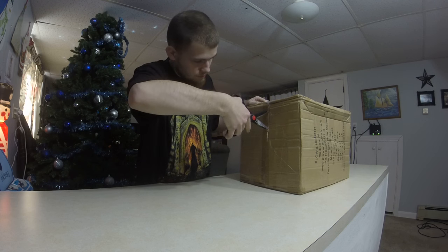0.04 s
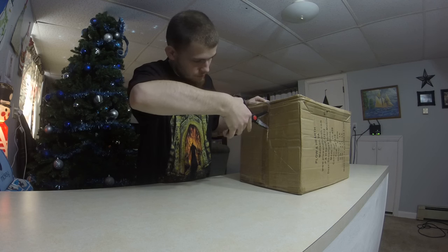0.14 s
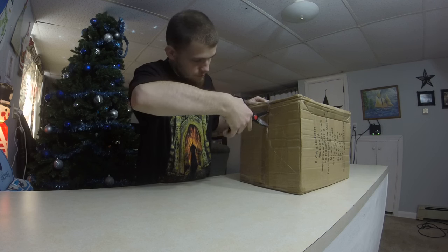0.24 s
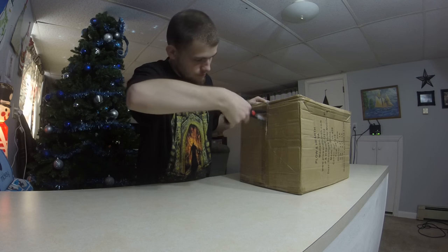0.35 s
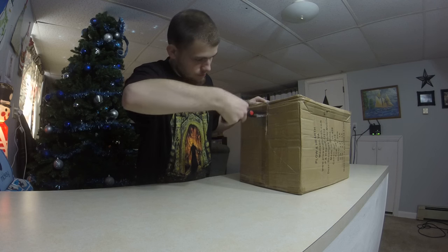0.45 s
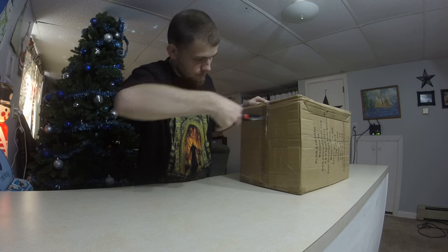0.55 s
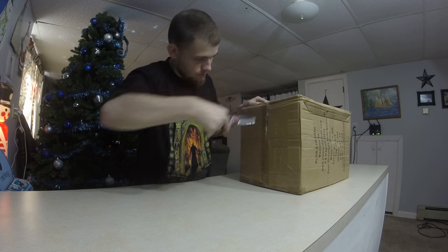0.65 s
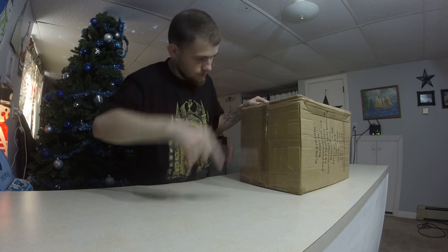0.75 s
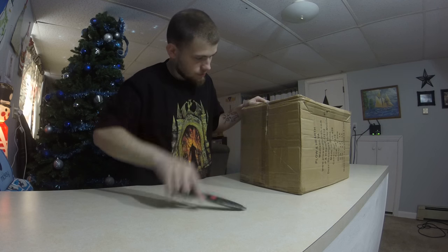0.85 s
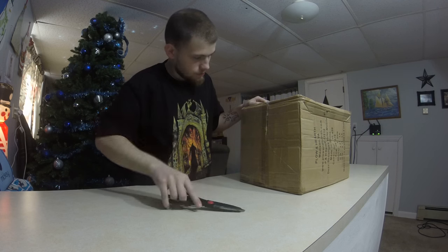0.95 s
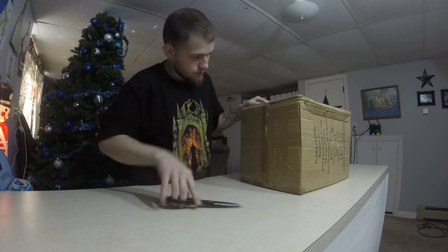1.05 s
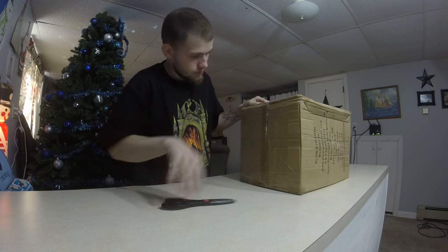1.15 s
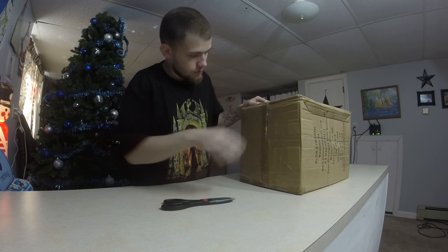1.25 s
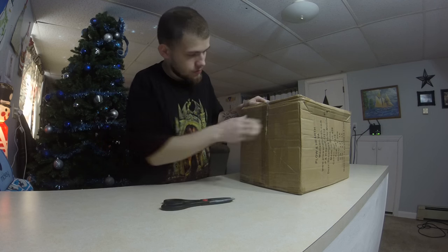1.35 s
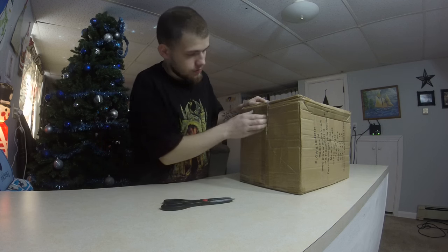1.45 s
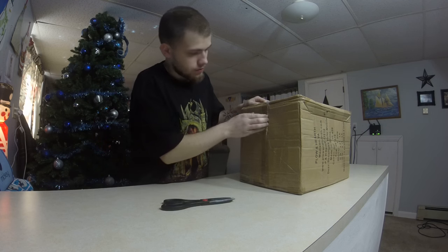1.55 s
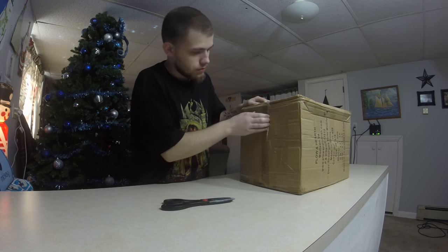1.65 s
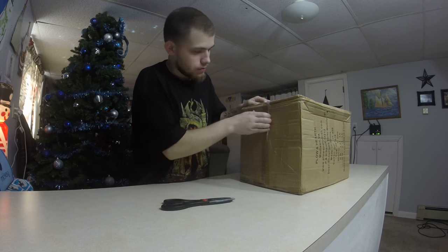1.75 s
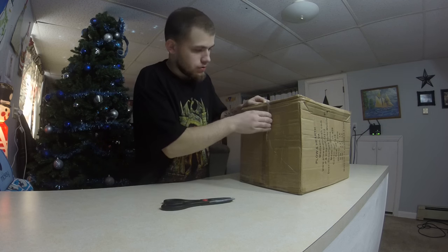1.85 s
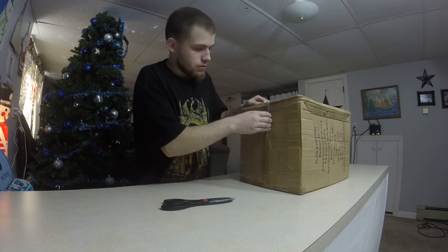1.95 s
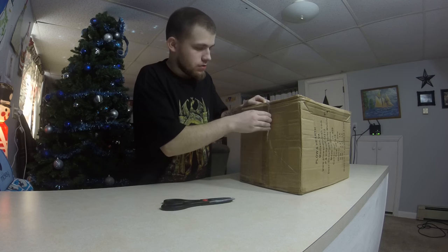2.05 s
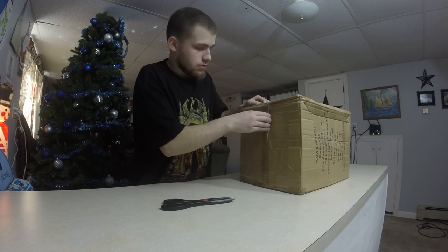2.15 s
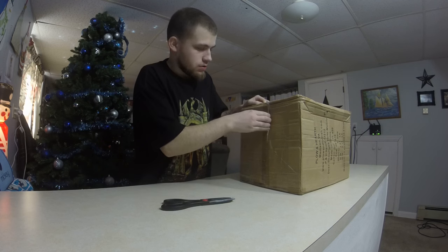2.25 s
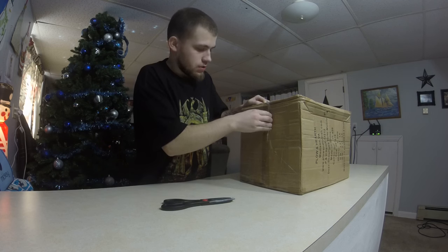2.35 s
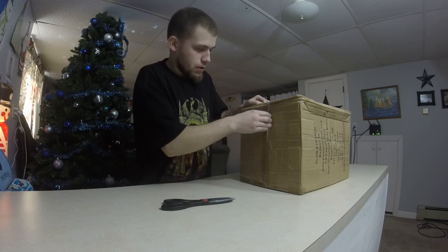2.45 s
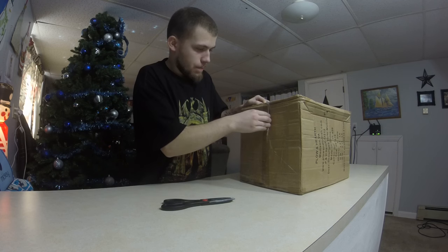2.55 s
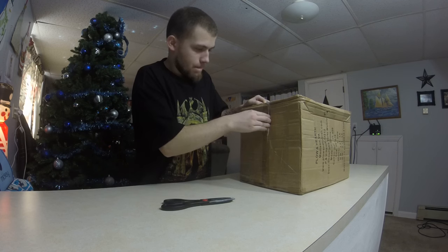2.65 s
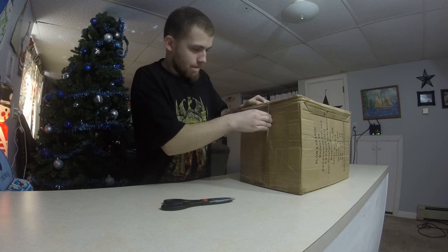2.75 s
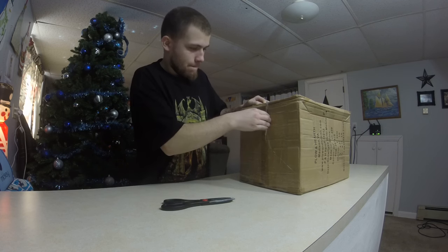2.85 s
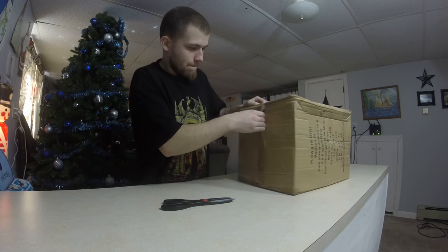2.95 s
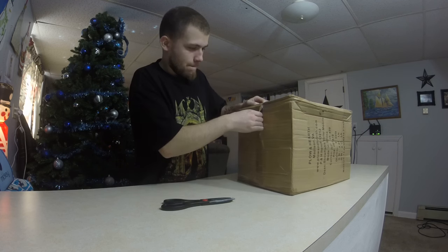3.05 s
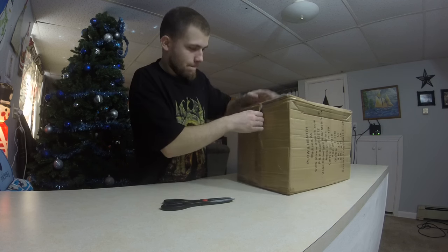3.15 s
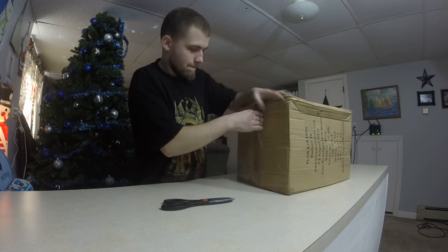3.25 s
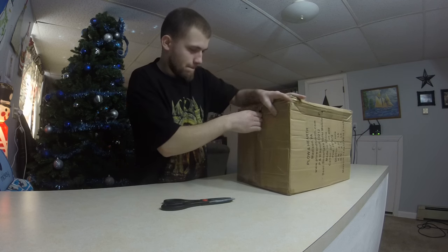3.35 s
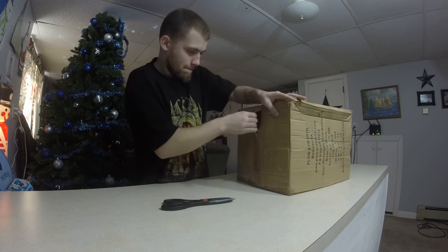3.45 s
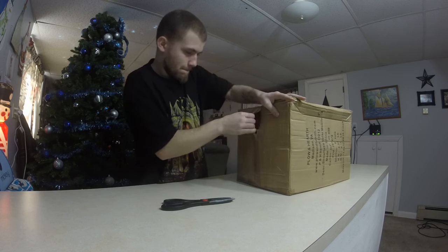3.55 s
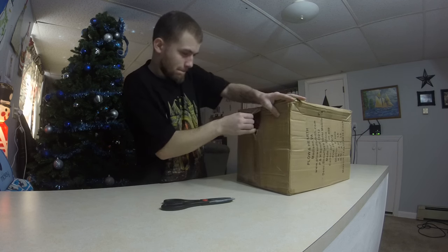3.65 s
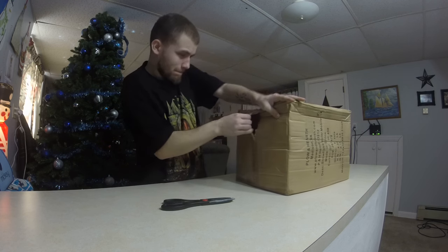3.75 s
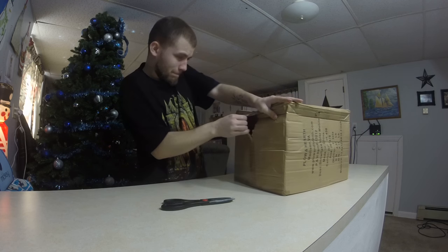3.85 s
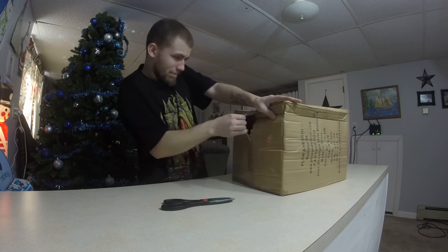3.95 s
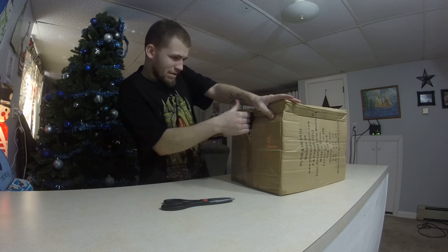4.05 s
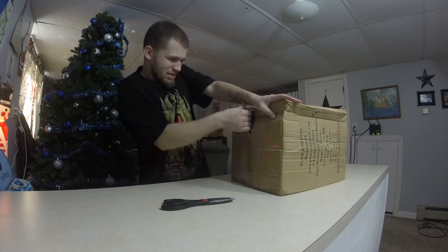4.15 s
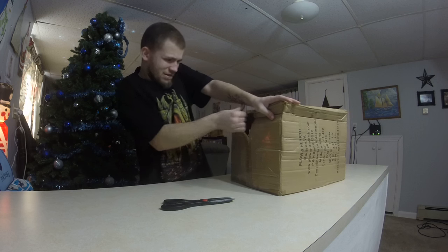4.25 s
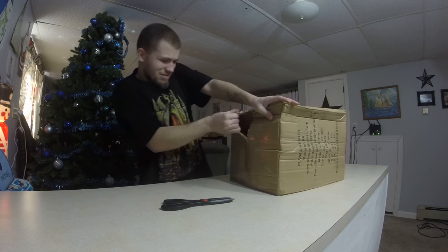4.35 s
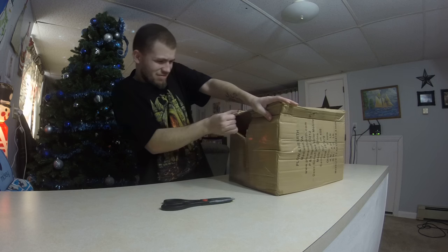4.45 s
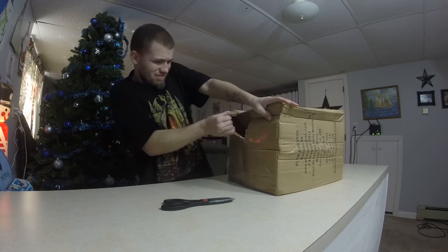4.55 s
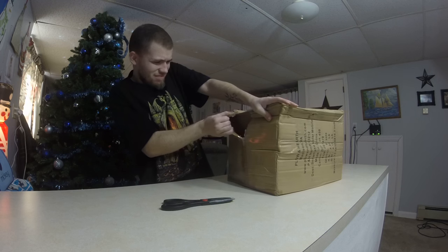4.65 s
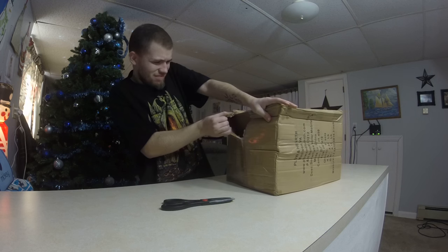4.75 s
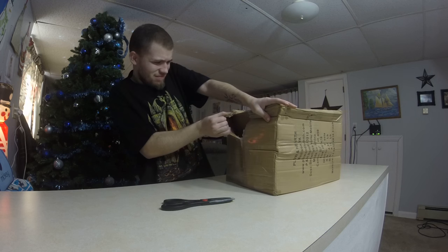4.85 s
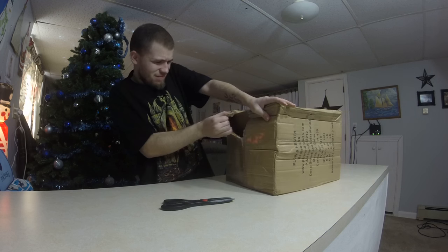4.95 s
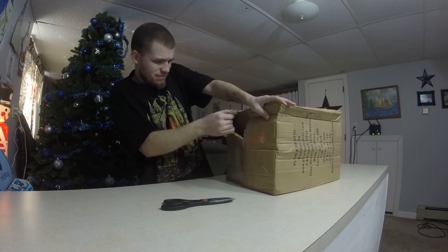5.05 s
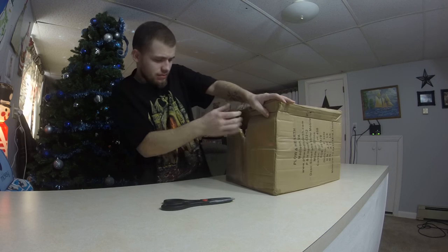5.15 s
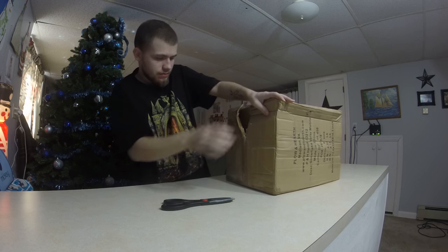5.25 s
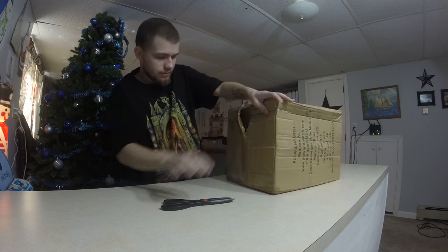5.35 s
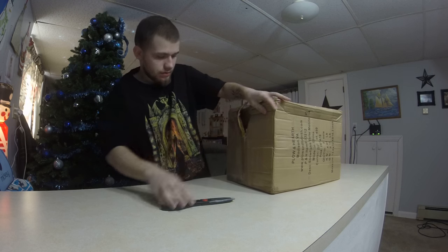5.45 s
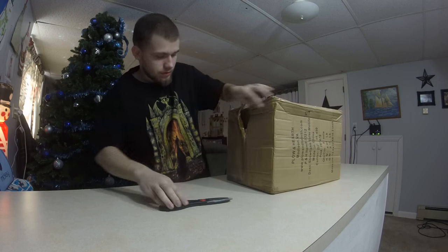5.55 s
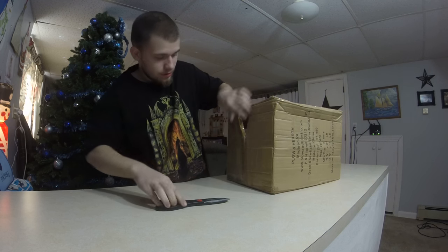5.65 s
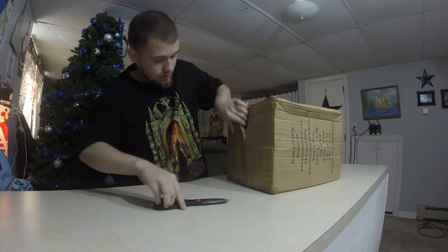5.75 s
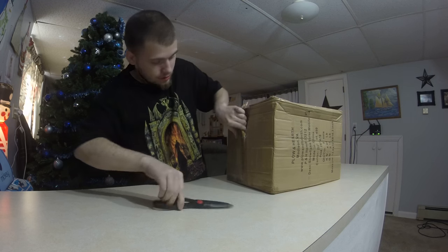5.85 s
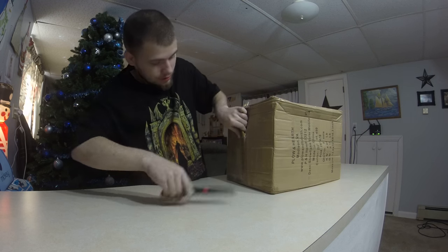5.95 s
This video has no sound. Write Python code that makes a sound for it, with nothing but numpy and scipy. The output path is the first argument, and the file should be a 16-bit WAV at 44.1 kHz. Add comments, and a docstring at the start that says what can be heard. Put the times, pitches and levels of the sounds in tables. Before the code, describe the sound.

In a small quiet room, scissor blades bite through tape on a hollow cardboard box with snaps and a thump, then clatter and slide onto a hard counter. Fingers pick quietly at the tape, then pull it in crackling rips, one suddenly very loud with a boxy thump. Smaller crackles follow, and the scissors are softly picked up. Close, dry pickup with low mains hum.

```python
"""Scissors snip the packing tape on a cardboard box: the blades ring, the tape snaps and the hollow box thumps.
They are dropped on the counter, where they slide and clatter: noise knocks and ringing metal.
Fingers rub, pick and pull off the tape in crackling rips, one of them loud: runs of tiny slips of glue.
At the end the scissors are picked up again, with soft knocks and scrapes.
Throughout, a small room adds short echoes, soft air noise and a low mains hum."""
import sys
import numpy as np
from scipy import signal
from scipy.fft import rfft, irfft
from scipy.io import wavfile

SR = 44100
rng = np.random.default_rng(int(sys.argv[2]) if len(sys.argv) > 2 else 0)


def unload_audio(sound):
    """Save the sound as a 16-bit wav file, at the path given as the first command line argument."""
    columns = np.transpose(np.atleast_2d(sound))
    # keep every value between -1 and 1, then stretch to whole-number steps
    steps = np.round(np.clip(columns, -1, 1) * 32767)
    wavfile.write(sys.argv[1], SR, steps.astype(np.int16))


N = 264996
T = np.arange(N) / SR  # time in the scene [s]
AGE = T[:SR // 3]  # time since a short sound began [s]

# In all tables of ringing tones, t60 is the time a tone takes to fade by 60 dB.
# ringing tones of the hollow box: (frequency [Hz], level [dB], t60 [s])
BOX_TONES = [(75, -25, .07), (127.5, 7, 0.058), (197, 2, 0.13), (211.6, 4, 0.16), (263.6, 14, 0.068),
             (274.2, -11.5, 0.24), (392.4, -9.5, 0.13)]
# ringing tones of the card panels: (frequency [Hz], level [dB], t60 [s])
PANEL_TONES = [(411, 10, 0.054), (586, -8.5, 0.18), (660, -9, 0.056), (818, -2, 0.096), (840, -18, 0.015),
               (1010, 1, 0.031), (1229, -2, 0.064)]
# ringing tones of the scissors pressed flat on the counter: (frequency [Hz], level [dB], t60 [s])
PRESSED_TONES = [(530, 2.5, 0.047), (600, -4.5, 0.051), (1014, -1, 0.064), (1715, 3, 0.033),
                 (1923, 1.5, .028), (2630, -4.5, 0.038), (2813, 0, 0.029), (3620, -5.5, 0.023),
                 (4740, -13.5, 0.026), (5620, -10, 0.013), (6360, -12, 0.032), (7800, -14, 0.048),
                 (9040, -20, 0.025), (10800, -24, 0.039)]
# tone colour of the tape: (frequency [Hz], level [dB])
TAPE_COLOUR = [(180, 6), (300, 1), (678, 0.5), (828, 0.5), (1150, -14), (1230, -16), (1690, -21.5),
               (5430, -24), (6620, -29), (14500, -43), (16000, -53)]
# tone colour of the scissors touching the counter: (frequency [Hz], level [dB])
CLATTER_COLOUR = [(180, 15), (300, -27), (667, 0.5), (1460, -9), (2030, -7.5), (3080, -10), (3950, -12.5),
                  (10700, -26.5), (15000, -39), (16000, -41)]

BLOW_S = .03  # reference length for the level of a short sound
LOW_HZ, CARD_HZ, HANDLE_HZ, TICK_HZ = 400, 1400, 3000, 7000  # borders between the parts of a sound
SNAP_T60_S = 0.049  # fade time of the noise in a tape snap or pick
TOUCH_START_S, TOUCH_END_S = 1.4, 6.0  # while fingertips rest on the tape


def undb(db):
    """Turn decibels into a gain."""
    return 10 ** (np.asarray(db) / 20)


def unit(x):
    """Scale to an average strength (rms) of 1."""
    return x / np.sqrt(np.mean(x ** 2) + 1e-20)


def blow(x):
    """Scale a short sound to the energy of rms 1 held for BLOW_S."""
    return x / np.sqrt(np.sum(x ** 2) / (BLOW_S * SR) + 1e-20)


def add(out, s, x):
    """Mix x into out, starting at time s."""
    i = max(int(s * SR), 0)
    out[i:i + len(x)] += x[:max(N - i, 0)]


def band(x, hz, kind):
    """Keep only some frequencies, with a Butterworth filter."""
    return signal.sosfilt(signal.butter(3, hz, kind, fs=SR, output="sos"), x)


def through(x, response):
    """Let every sample of x set off the response (convolution)."""
    return signal.fftconvolve(x, response)[:len(x)]


def colour(x, points, size=4096):
    """Shape the tone to an outline of (Hz, dB) points, without any sound before its cause."""
    hz, db = np.transpose(points)
    outline = np.interp(np.log(np.fft.rfftfreq(size, 1 / SR) + 1), np.log(hz), db)
    # folding the cepstrum gives a minimum-phase filter
    cepstrum = irfft(np.log(undb(outline)))
    cepstrum[1:size // 2] *= 2
    cepstrum[size // 2 + 1:] = 0
    return through(x, irfft(np.exp(rfft(cepstrum))))


def split(x, top_hz):
    """Middle, upper and treble parts of a sound."""
    middle = band(x, [LOW_HZ, CARD_HZ], "bandpass")
    upper = band(x, [CARD_HZ, top_hz], "bandpass")
    return middle, upper, band(x, top_hz, "highpass")


def ring(modes, scatter_db, detune):
    """Fading tones of a struck object; each point of contact changes their levels and pitches a little."""
    hz, db, t60 = np.transpose(modes)[:, :, None]
    weight, shift = rng.uniform(-1, 1, (2, len(modes), 1))
    waves = np.sin(2 * np.pi * hz * (1 + detune * shift) * AGE)
    fade = np.exp(-np.log(1000) * AGE / t60)
    return np.sum(undb(db + scatter_db * weight) * waves * fade, axis=0)


def crack(t60, click_db):
    """A sharp click and its quickly fading noise."""
    fade = np.exp(-np.log(1000) * AGE / t60)
    out = blow(rng.standard_normal(len(AGE)) * fade)
    out[0] += undb(click_db) * np.sqrt(BLOW_S * SR)
    return out


def grains(rate, spread_db, smear_db):
    """Tiny slips of unequal size, rate per second on average, each with a short hiss after it."""
    sizes = undb(spread_db * np.minimum(rng.exponential(size=N), 4)) * rng.choice([-1, 1], N)
    slips = sizes * (rng.random(N) < rate / SR)
    keep = np.exp(-1 / (.004 * SR))  # the power of the hiss fades over 4 ms
    power = signal.lfilter([1 - keep], [1, -keep], slips ** 2)
    return slips + undb(smear_db) * np.sqrt(power) * rng.standard_normal(N)


def stroke(start, length, attack, release):
    """Pressure of one stroke: it rises, holds and dies away."""
    rise = np.clip((T - start) / attack, 0, 1)
    return rise * np.exp(-np.maximum(T - start - length, 0) / release)


def rips():
    """Glue lets go in a swelling run of slips that drive the card beneath and rock the box."""
    # tape tearing loose: (middle [s], half length [s], box thump [dB], tape [dB], brightness [dB])
    # brightness turns the treble up and the card down
    rip_table = [(0.274, 0.013, -32.5, -42.5, -5.5), (0.414, 0.021, -36.5, -55.5, -16.5),
                 (0.501, 0.0079, -31.5, -36.5, -3.5), (2.992, 0.035, -43, -44, 0.5),
                 (3.047, 0.023, -33.5, -46, -2.5), (3.156, 0.041, -44, -46, -1.5),
                 (3.339, 0.032, -41, -45, 3.5), (3.468, 0.028, -32, -34, 0.5), (3.798, 0.037, -34, -37, -5),
                 (3.843, 0.019, -60, -38.5, -1.5), (4.079, 0.064, -44, -50, 0), (4.239, 0.016, -61, -46, 4),
                 (4.31, 0.012, -17.5, -16, -1), (4.538, 0.0097, -36, -44, 10),
                 (4.571, 0.012, -42, -40.5, 14.5), (4.597, 0.018, -40.5, -46.5, -8),
                 (5.17, 0.0076, -49, -39, -0.5)]
    card_db, sizzle_db, rock_db = -3.5, -7.5, -21  # card and sizzle relative to tape, rocking to thump
    slips = colour(grains(rate=2500, spread_db=5.0, smear_db=-3.0), TAPE_COLOUR)
    card, tape, sizzle = split(slips, TICK_HZ)
    panels = ring(PANEL_TONES, scatter_db=1, detune=.005)
    card = unit(card) + undb(-6) * unit(through(card, panels))
    parts = box_rocking(), box_rumble(), card, tape, sizzle
    out = np.zeros(N)
    for s, half, thump_db, tape_db, bright_db in rip_table:
        levels = (thump_db + rock_db, thump_db, tape_db + card_db - bright_db,
                  tape_db, tape_db + sizzle_db + bright_db)
        near = np.abs(T - s) < 2 * half
        swell = np.exp(-((T[near] - s) / half) ** 2)
        out[near] += swell * sum(undb(db) * unit(part[near]) for db, part in zip(levels, parts))
    return out


def snaps():
    """The sudden snaps of tape and card as the tape is cut and pulled."""
    # tape snapping and card buckling: (time [s], box thump [dB], crack [dB], brightness [dB])
    # brightness turns the treble up and the card down
    snap_table = [(0.1724, -17, -31.5, -0.5), (0.1841, -30, -39, 3), (0.234, -27.5, -43.5, 3),
                  (0.319, -60, -54.5, 4), (0.394, -39, -47.5, 4), (1.458, -41.5, -75, -14),
                  (1.538, -37.5, -54, -6.5), (1.5606, -33, -39.5, 1), (1.993, -67, -56, 6),
                  (2.12, -71, -66.5, 16.5), (2.24, -76, -65, 0), (2.672, -51.5, -52, 1.5),
                  (2.761, -52, -53.5, -2), (2.893, -50, -42.5, 3), (2.946, -49, -45, 4),
                  (3.101, -41, -52.5, 0), (3.224, -68, -58.5, 15.5), (3.318, -39, -42, -4.5),
                  (3.347, -31, -48.5, -2), (3.434, -45, -47, 0), (3.4643, -39, -31.5, 1),
                  (3.817, -40, -35, 11), (3.851, -62, -48.5, 15.5), (4.157, -48, -43.5, -2.5),
                  (4.205, -65, -48.5, 6.5), (4.298, -21.5, -28, 11), (4.304, -18, -21, -1.5),
                  (4.355, -48, -40.5, 13.5), (4.482, -66, -55.5, 8), (4.557, -56, -40.5, 1),
                  (4.595, -50, -47.5, 24), (4.668, -36.5, -50.5, -8.5), (4.766, -38, -64, -22.5),
                  (4.928, -43.5, -58.5, -17.5), (5.1634, -71, -42.5, 4), (5.178, -42, -45.5, 0),
                  (5.3414, -64, -48.5, 5), (5.457, -66, -51, 7), (5.589, -43, -50, -8),
                  (5.684, -47, -55.5, -9)]
    out = np.zeros(N)
    for s, *levels in snap_table:
        add(out, s, snap(*levels))
    return out


def snap(thump_db, crack_db, bright_db):
    """Tape gives way at once: a tick, a crack in the panels and a thump of the whole box."""
    card_db, tick_db = -.5, -13  # relative to the crack
    card, tape, tick = split(colour(crack(SNAP_T60_S, click_db=-4.5), TAPE_COLOUR), TICK_HZ)
    panels = ring(PANEL_TONES, scatter_db=3, detune=.015)
    card = blow(card) + undb(-7.0) * blow(band(panels, LOW_HZ, "highpass"))
    tape = blow(tape) + undb(-11) * blow(flap(0.89 * SNAP_T60_S))
    thump = band(ring(BOX_TONES, scatter_db=2, detune=.015), 90, "highpass")
    levels = thump_db, crack_db + card_db - bright_db, crack_db, crack_db + tick_db + bright_db
    return sum(undb(db) * blow(part) for db, part in zip(levels, (thump, card, tape, tick)))


def flap(t60, count=7):
    """Each loose piece of tape has its own few short resonances."""
    hz = 1700 * 2 ** (2 * rng.random(count))
    return ring([(f, 0, t60) for f in hz], scatter_db=-6.5, detune=0)


def snips():
    """The blades ring briefly each time they bite through the tape."""
    # blades closing through the tape: (time [s], level [dB])
    snip_table = [(0.172, -47), (0.1833, -36), (0.233, -46), (.319, -51)]
    # ringing tones of the closing blades: (frequency [Hz], level [dB], t60 [s])
    blade_tones = [(1115, -4.5, 0.038), (2790, -1, 0.024), (2980, 2, 0.019), (3550, -3, 0.023),
                   (5230, -22, .04)]
    out = np.zeros(N)
    for s, db in snip_table:
        add(out, s, undb(db) * blow(ring(blade_tones, scatter_db=2, detune=0.013)))
    return out


def knocks():
    """Handles and blades bounce on the counter; each contact shifts their ring, less so under the hand."""
    # knocks: (time [s], thud [dB], clack [dB], brightness [dB], share of the pressed ring)
    # brightness turns the blades up and the counter down
    # share: 1 is pressed by the hand, 0 is loose, below 0 takes pressed ring away from extra loose ring
    knock_table = [(0.905, -36, -26.5, -1.5, 0.97), (0.944, -42.5, -37.5, 0.5, 0.63),
                   (1.1391, -33.5, -27, 3.5, 0.04), (1.157, -41, -23, 3, 0), (1.167, -36, -40, -10.5, 0),
                   (1.179, -37, -42, -13, 0), (1.2, -34, -45.5, -16, 0.1), (1.212, -39, -47, -16, 0.2),
                   (1.2269, -37, -32.5, 3.5, 0), (1.236, -45, -35.5, 1, -2), (1.247, -38.5, -36, -4, 0),
                   (1.29, -45, -44, -5.5, 0), (5.8671, -40.5, -39.5, -2.5, 0.8),
                   (5.889, -47.5, -49.5, -3.5, 0.1), (5.971, -48.5, -41.5, -2, 0.4),
                   (5.995, -49, -50, 2.5, 0.3)]
    # ringing tones of the loose scissors: (frequency [Hz], level [dB], t60 before damping [s])
    loose_tones = [(585, 1.5, 0.1), (540, 2, 0.13), (619, 5.5, 0.14), (1009, 1, 0.12), (1875, 0, 0.07),
                   (2000, -4.5, 0.019), (2024, 17.5, 0.034), (2527, 5.5, 0.023), (3070, -26, 0.034),
                   (3680, -2, 0.052), (3960, 8.5, 0.024), (4430, -0.5, 0.081), (5630, -9, 0.084),
                   (6300, -5.5, 0.065), (7880, -19, 0.077), (8440, -7, 0.043), (10640, -29, 0.027)]
    counter_db, blade_db = -5, -5.5  # relative to the clack
    damp_s = 0.021  # the counter damps the bouncing scissors
    out = np.zeros(N)
    for s, thud_db, clack_db, bright_db, pressed in knock_table:
        contact = blow(colour(crack(0.092, click_db=-45), CLATTER_COLOUR))
        loose = blow(ring(loose_tones, scatter_db=3, detune=.06) * np.exp(-AGE / damp_s))
        loose = blow(loose + undb(1) * contact)
        held = blow(ring(PRESSED_TONES, scatter_db=1, detune=.005)) + undb(-12) * contact
        clack = pressed * held + (1 - pressed) * loose
        thud = band(crack(0.18, click_db=-5.0), [90, 380], "bandpass")
        parts = thud, *split(clack, HANDLE_HZ)
        levels = thud_db, clack_db + counter_db - bright_db, clack_db, clack_db + blade_db + bright_db
        add(out, s, sum(undb(db) * blow(part) for db, part in zip(levels, parts)))
    return out


def slide():
    """The grain of the counter rubs the sliding scissors and sets them ringing."""
    # scissors sliding on the counter: (start [s], length [s], level [dB])
    slide_table = [(1.04, 0.081, -41), (1.178, 0.12, -56), (5.512, 0.035, -52), (5.834, 0.073, -52)]
    attack_s, release_s = 0.0075, 0.015
    rub = grains(rate=4000, spread_db=2, smear_db=-6)
    ringing = band(through(rub, ring(PRESSED_TONES, scatter_db=0, detune=0)), LOW_HZ, "highpass")
    hiss = band(colour(rub, CLATTER_COLOUR), HANDLE_HZ, "highpass")
    scrape = unit(ringing) + undb(-7.5) * unit(hiss)
    pressure = sum(undb(db) * stroke(start, length, attack_s, release_s)
                   for start, length, db in slide_table)
    return unit(scrape) * pressure


def handling():
    """Fingers rub and crinkle the tape in strokes, and barely stir it while they rest."""
    # fingers and blades rubbing the tape: (start [s], length [s], rustle [dB], box rumble [dB])
    rub_table = [(0.318, 0.16, -57.5, -46), (1.747, 0.17, -60.5, -59), (2.362, 0.034, -65, -61),
                 (2.743, 0.28, -56, -57), (3.05, 0.087, -58.5, -49.5), (3.362, 0.43, -54.5, -53),
                 (3.85, 0.044, -50.5, -59), (4.052, 0.35, -52.5, -59), (4.363, 0.33, -56.5, -54),
                 (4.71, 0.18, -58.5, -54), (4.989, 0.21, -55, -55.5), (5.072, 0.15, -50, -58),
                 (5.303, 0.16, -55.5, -58.5), (5.533, 0.25, -63.5, -48.5)]
    # tone colour of the rustle: (frequency [Hz], level [dB])
    rustle_colour = [(240, -20), (400, 2), (425, -45), (489, -2.5), (708, -6.5), (814, -4.5), (1200, -8),
                     (3120, -1), (7060, -12.5), (14800, -27.5), (16000, -60)]
    attack_s, release_s = 0.03, 0.092
    touch = stroke(TOUCH_START_S, TOUCH_END_S - TOUCH_START_S, attack_s, release_s)
    on_tape, on_box = undb(-70.5) * touch, undb(-67.5) * touch
    for start, length, rustle_db, rumble_db in rub_table:
        pressure = stroke(start, length, attack_s, release_s)
        on_tape = np.maximum(on_tape, undb(rustle_db) * pressure)
        on_box = np.maximum(on_box, undb(rumble_db) * pressure)
    crinkle = grains(rate=1300, spread_db=4.6, smear_db=0)
    card, tape, sizzle = split(colour(crinkle, rustle_colour), TICK_HZ)
    rustle = unit(tape) + undb(-3) * unit(card) + undb(-8.5) * unit(sizzle)
    # lone creases pop on top of the dense crinkle
    pops = grains(rate=60, spread_db=2.0, smear_db=-2.5)
    rustle = rustle + undb(-6.5) * unit(band(colour(pops, rustle_colour), CARD_HZ, "highpass"))
    return on_tape * rustle + on_box * box_rumble()


def picks():
    """Fingernails flick the tape at random moments, too lightly to move the box."""
    picks_per_s, level_db, spread_db = 4, -63, 5
    touch_s = TOUCH_END_S - TOUCH_START_S
    out = np.zeros(N)
    for when, size in rng.random((int(picks_per_s * touch_s), 2)):
        tick = blow(band(colour(crack(SNAP_T60_S, click_db=-4), TAPE_COLOUR), 1850, "highpass"))
        add(out, TOUCH_START_S + when * touch_s, undb(level_db + spread_db * (2 * size - 1)) * tick)
    return out


def chafes():
    """Tape, fingertips and scissors drag along a surface and hiss in one band each."""
    # chafes: (middle [s], half length [s], pitch [Hz], band half-width [share of pitch], level [dB])
    chafe_table = [(1.877, 0.061, 3160, .3, -65), (2.811, 0.047, 2960, .2, -55),
                   (4.568, 0.013, 3800, 0.23, -32), (4.612, 0.011, 4200, 0.14, -39.5),
                   (4.823, 0.11, 3230, 0.06, -65), (5.18, .007, 900, .25, -31.5),
                   (5.377, 0.0016, 13500, 0.15, -39.5), (5.537, 0.014, 1960, 0.18, -50.5),
                   (5.734, .06, 2070, .08, -61), (5.903, 0.0098, 2100, 0.18, -39)]
    out = np.zeros(N)
    for s, half, hz, width, db in chafe_table:
        age = np.arange(-2 * half, 2 * half, 1 / SR)
        edges = np.clip([hz * (1 - width), hz * (1 + width)], 100, .45 * SR)
        hiss = band(rng.standard_normal(len(age)), edges, "bandpass")
        swell = np.exp(-(age / half) ** 2)
        add(out, s - 2 * half, undb(db) * unit(hiss) * swell)
    return out


def shoves():
    """Hands shove the box: each push swells and fades, and the box rocks and rumbles with it."""
    # shoves: (middle [s], half length [s], rocking level [dB])
    shove_table = [(0.195, 0.016, -34), (.41, .025, -41), (1.474, 0.013, -41), (1.558, .015, -43),
                   (3.025, 0.052, -41.5), (3.337, 0.049, -43.5), (3.829, 0.031, -42), (4.314, 0.023, -35)]
    force = sum(undb(db) * np.exp(-((T - s) / half) ** 2) for s, half, db in shove_table)
    return force * (box_rocking() + undb(-5.5) * box_rumble())


def box_rocking():
    """The whole box wobbles on the counter: a band of very low noise."""
    return unit(band(rng.standard_normal(N), [36, 76], "bandpass"))


def box_rumble():
    """Irregular tugs shake the hollow box and make it ring."""
    tugs = grains(rate=740, spread_db=4.5, smear_db=-3.5)
    body = unit(through(tugs, ring(BOX_TONES, scatter_db=0, detune=0)))
    direct = unit(band(tugs, [170, LOW_HZ], "bandpass"))
    return unit(band(body, 126, "highpass") + undb(-10.5) * direct)


def room(x, wet_db, t60, dull_hz, bounce_db):
    """One quick bounce off the counter, and a short, duller tail from the walls."""
    tail = rng.standard_normal(len(AGE)) * np.exp(-np.log(1000) * AGE / t60)
    tail = tail * np.clip(AGE / 0.0046 - .5, 0, 1)  # the tail fades in after about 2 ms
    tail = signal.lfilter(*signal.butter(1, dull_hz, fs=SR), tail)
    response = undb(wet_db) * unit(tail) / np.sqrt(len(AGE))
    response[0] += 1  # the direct sound
    response[int(.004 * SR)] += undb(bounce_db)
    return through(x, response)


def background():
    """Still room air as coloured noise, and a mains hum of tones that waver slightly."""
    # tone colour of the room air: (frequency [Hz], level [dB])
    air_colour = [(12, -43), (20, -5), (65, -0.5), (96, -12.5), (123, 2.5), (163, -7.5), (293, -17.5),
                  (337, -12.5), (459, -16.5), (873, -17), (1030, -19.5), (5080, -31.5), (11800, -43.5),
                  (14300, -52), (16000, -72)]
    # tones of the mains hum: (frequency [Hz], level [dB])
    hum_tones = [(58, -66), (115.3, -52), (173, -64.5), (231, -64), (289, -62.5)]
    hum = 0
    for hz, db in hum_tones:
        knots = np.linspace(0, T[-1], 40)
        drift, sway = (np.interp(T, knots, rng.standard_normal(len(knots))) for _ in range(2))
        hum = hum + np.sqrt(2) * undb(db + sway) * np.sin(2 * np.pi * hz * T + .45 * drift)
    return hum + undb(-55) * unit(colour(rng.standard_normal(N), air_colour))


def scene():
    """Box, tape and scissors in the room, over the background."""
    tape_and_box = rips() + snaps() + picks() + shoves() + handling() + chafes()
    scissors = snips() + knocks() + slide()
    echoed = room(tape_and_box + scissors, wet_db=-16.5, t60=0.17, dull_hz=6500, bounce_db=-35)
    return (echoed + background())[None]


def record(dry):
    """Round off the loudest peaks and cut the treble above 15700 Hz."""
    rounded = .95 * np.tanh(dry / .95)
    return signal.sosfilt(signal.ellip(8, .2, 70, 15700, fs=SR, output="sos"), rounded)


dry = scene()
out = record(dry)
unload_audio(out)
```